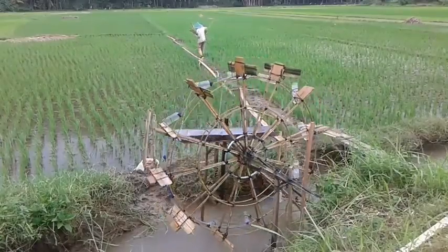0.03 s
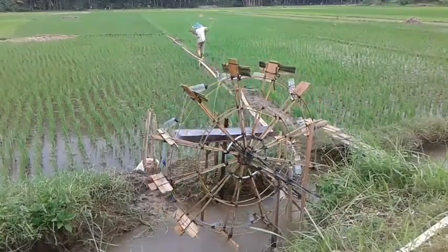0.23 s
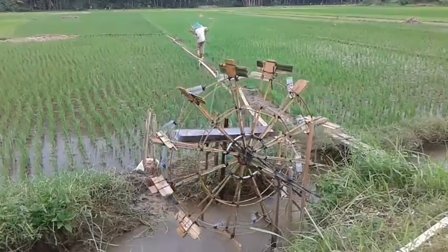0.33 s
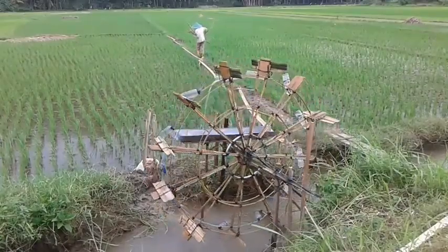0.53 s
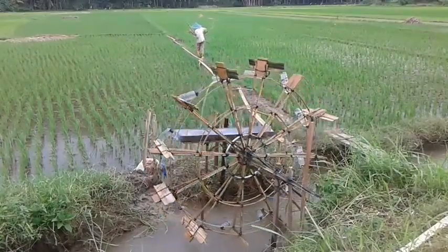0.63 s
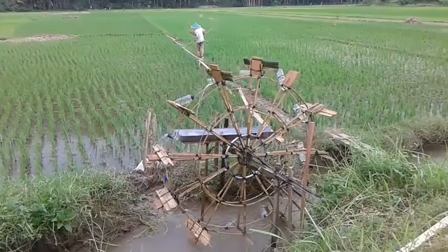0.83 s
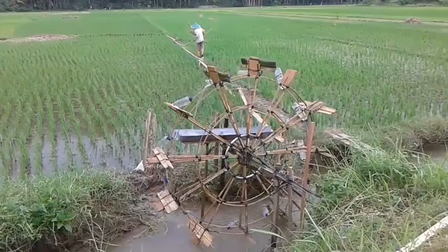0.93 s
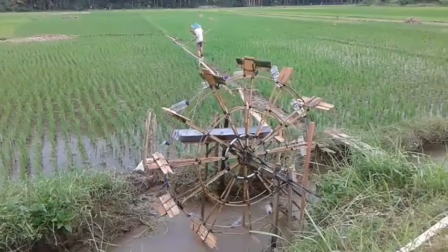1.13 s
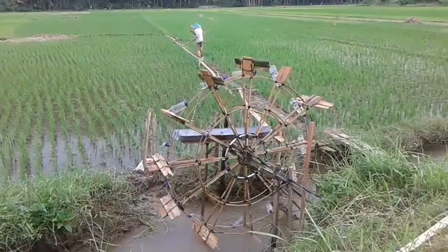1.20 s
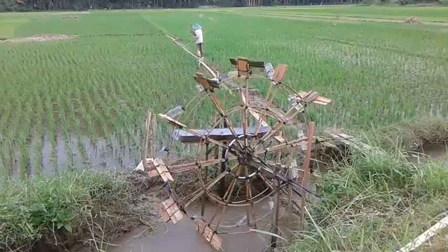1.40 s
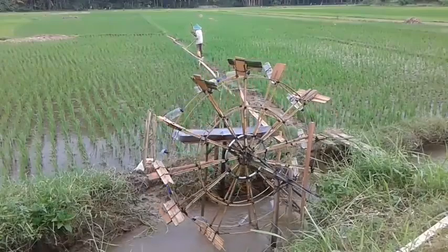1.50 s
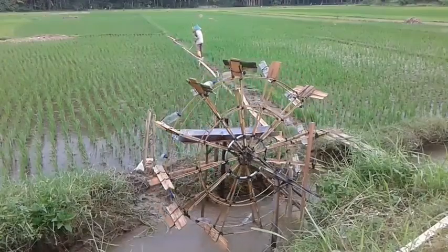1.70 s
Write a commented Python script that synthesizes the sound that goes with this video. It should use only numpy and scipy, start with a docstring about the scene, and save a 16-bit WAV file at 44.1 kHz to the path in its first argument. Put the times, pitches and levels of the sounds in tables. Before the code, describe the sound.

Water drips and spatters from a turning wooden water wheel as wind rumbles, then a slat clacks

```python
"""Wooden water wheel in wind

A small wheel in a channel beside a rice field: filtered noise, clicks and bubble notes make an uneven trickle.
Close drops ring and fizz, droplets tick, dollops land as decaying clusters of clicks, paddles slosh as shaped
noise; late on, a loose slat clacks as a noise burst ringing wood modes. The field is a steady noise hush.
Wind is low rumble following a gust curve, with single pressure pulses buffeting the microphone."""
import sys
import numpy as np
from scipy import signal
from scipy.fft import rfft, irfft
from scipy.io import wavfile
from scipy.ndimage import uniform_filter1d

SR = 44100
rng = np.random.default_rng(int(sys.argv[2]) if len(sys.argv) > 2 else 0)


def bounce(signal):
    """Save signal as a 16-bit WAV file at the path given by the first command-line argument."""
    frames = np.transpose(np.atleast_2d(signal))
    limited = np.clip(frames, -1, 1)
    pcm = np.round(limited * 32767).astype(np.int16)
    wavfile.write(sys.argv[1], SR, pcm)


N = 77175

# fine splashing spectrum [f/Hz, relative level/dB per Hz]
SPLASH_SPECTRUM = [(200, -13.5), (600, -5.5), (1200, -3.5), (2300, -4.5), (3100, -2.5), (3900, 2.5),
                   (4600, -5.5), (5600, -9.5), (7000, -18.5), (10000, -16.5), (11000, -33), (17000, -50)]


def amp(db):
    """Decibels to gain."""
    return 10 ** (np.asarray(db) / 20)


def evened(x):
    """Scales to rms 1."""
    return x / np.sqrt(np.mean(x ** 2) + 1e-20)


def decay(t, t60_s):
    """Exponential decay, -60 dB at t60_s."""
    return np.exp(-np.log(1000) * t / t60_s)


def read(points, hz):
    """Interpolates a dB spectrum on a log-frequency axis."""
    f, value = np.transpose(points)
    return np.interp(np.log(hz + 1), np.log(f + 1), value)


def level(curve):
    """A dB curve over time as a gain for every sample."""
    return amp(np.interp(np.arange(N) / SR, *np.transpose(curve)))


def add(mix, s, sound):
    """Mixes a sound in at s seconds, cut at the end of the mix."""
    part = mix[max(round(s * SR), 0):][:len(sound)]
    part += sound[:len(part)]


def colour(x, points, tilt_db_per_octave=0, size=4096):
    """Minimum-phase filter with the given spectrum, tilted about 2 kHz between 600 and 5500 Hz."""
    hz = abs(np.fft.fftfreq(size, 1 / SR))
    octaves = np.log2(np.clip(hz, 600, 5500) / 2000)
    log_gain = np.log(amp(read(points, hz) + tilt_db_per_octave * octaves))
    # Hilbert transform of log gain gives the causal phase
    taps = np.fft.ifft(np.exp(np.conj(signal.hilbert(log_gain)))).real[:size // 2]
    return signal.fftconvolve(x, taps)[:len(x)]


def impacts(per_s, spread_db):
    """Random clicks of either sign, most small and a few large."""
    size = amp(spread_db * np.minimum(rng.exponential(1, N), 3.5))
    sign = rng.choice([-1, 1], N)
    return size * sign * (rng.random(N) < per_s / SR)


def ping(hz, t60_s):
    """A trapped bubble: a soft start, a slightly rising note, a quick decay."""
    rise_s, glide_per_s = 0.00023, 1.8
    t = np.arange(SR // 12) / SR
    envelope = (1 - np.exp(-(t / rise_s) ** 2)) * decay(t, t60_s)
    note = np.sin(2 * np.pi * hz * t * (1 + glide_per_s * t / 2))
    return envelope / envelope.max() * note


def bubbles(per_s, centre_hz, octaves, t60_s, count=32):
    """A crowd of bubbles: random pings at pitches spread round one centre."""
    share = (np.arange(count) + .5) / count
    # logistic spread: dense at the centre, sparse at the edges
    pitches_hz = centre_hz * 2 ** (octaves * np.log(share / (1 - share)) / 2)
    total = 0
    for hz in pitches_hz:
        clicks = impacts(per_s / count, spread_db=3.6)
        total = total + signal.oaconvolve(clicks, ping(hz, t60_s))[:N]
    return evened(total)


def splashing(size=256):
    """Spray too fine to resolve: a hiss that flickers overall and shifts in time-frequency patches."""
    flicker_db, patch_db = 1.0, 2.2
    hz, t, z = signal.stft(rng.standard_normal(N), SR, nperseg=size)
    flicker = evened(uniform_filter1d(rng.standard_normal(len(t)), size=5))
    patches = uniform_filter1d(rng.standard_normal(z.shape), size=6, axis=0)
    patches = evened(uniform_filter1d(patches, size=5, axis=1))
    gain_db = read(SPLASH_SPECTRUM, hz)[:, None] + flicker_db * flicker + patch_db * patches
    return evened(signal.istft(z * amp(gain_db), SR, nperseg=size)[1][:N])


def trickle():
    """Water falling from the scoops: spray, spatter, small bubbles and deeper gurgles follow one flow."""
    # flow of spilling water [t/s, relative level/dB]
    flow = [(0, -7), (.2, -6.5), (.33, -1.5), (.5, -2.5), (.7, 0.5), (.85, 0), (1.0, 0), (1.2, 0),
            (1.35, -5), (1.6, -4.5), (1.75, -15)]
    spray_db, spatter_db, bubble_db, gurgle_db = -51.5, -53, -54, -58.5
    spatter = evened(colour(impacts(per_s=600, spread_db=4.5), SPLASH_SPECTRUM))
    small = bubbles(per_s=380, centre_hz=3627, octaves=0.319, t60_s=0.016)
    gurgles = bubbles(per_s=90, centre_hz=1512, octaves=0.6, t60_s=0.056)
    water = amp(spray_db) * splashing() + amp(spatter_db) * spatter
    water = water + amp(bubble_db) * small + amp(gurgle_db) * gurgles
    return level(flow) * water


def slosh():
    """The paddles push through the channel with a low wash of shaped noise."""
    # slosh round the paddles [t/s, level/dB]
    slosh_curve = [(0, -58), (.2, -68), (.34, -48.5), (.37, -49.5), (.52, -44), (.6, -52), (.9, -55.5),
                   (1.15, -54), (1.33, -54), (1.42, -49), (1.6, -49.5), (1.75, -53.5)]
    # its spectrum [f/Hz, relative level/dB per Hz]
    slosh_spectrum = [(150, 4.5), (350, -9.5), (530, 2), (830, -9), (1050, -18), (1600, -26), (3000, -10),
                      (8000, -58)]
    return level(slosh_curve) * evened(colour(rng.standard_normal(N), slosh_spectrum))


def field_hush():
    """The open field: a steady hush of shaped noise."""
    # field spectrum [f/Hz, relative level/dB per Hz]
    field_spectrum = [(25, -1), (110, -4.5), (250, 3.5), (380, 0), (520, -8), (900, -7.5), (2400, -16),
                      (3300, -10.5), (4000, -5.5), (4700, -15.5), (7000, -23.5), (10000, -27.5),
                      (11000, -25), (17000, -28)]
    return amp(-51) * evened(colour(rng.standard_normal(N), field_spectrum))


def wind(size=2200):
    """Lumpy turbulence rumbles with the gust; single eddies give short pressure pops."""
    # wind at the microphone [t/s, level/dB]
    gust = [(0, -50.5), (.17, -46), (.33, -39.5), (.40, -40.5), (.435, -32.5), (.51, -34), (.56, -44.5),
            (.61, -37), (.66, -31.5), (.72, -37), (.85, -33), (.91, -39.5), (1.0, -40), (1.12, -38),
            (1.26, -41.5), (1.42, -50.5), (1.48, -44.5), (1.75, -67.5)]
    # rumble spectrum [f/Hz, relative level/dB per Hz]
    rumble_spectrum = [(15, -46), (35, -5), (60, 0), (95, 3), (160, -4.5), (230, -10.5), (320, -16),
                       (500, -35.5), (1000, -50), (3000, -66), (6000, -110)]
    # eddies popping on the microphone [t/s, f/Hz, level at t/dB]
    buffets = [(0.3597, 97, -25), (0.4316, 93, -20.5), (0.6184, 180, -12.5), (0.502, 125, -26),
               (0.7533, 138, -21), (0.7968, 144, -19), (0.8544, 101, -17.5), (0.989, 125, -26.5),
               (1.1102, 88, -30.5)]
    eddy_db, eddy_s = 4.5, 0.021
    lean, rebound = 0.27, 1.04  # pulse asymmetry, undershoot
    lumps = evened(uniform_filter1d(rng.standard_normal(N + size), round(eddy_s * SR)))
    rumble = colour(rng.standard_normal(N + size) * amp(eddy_db * lumps), rumble_spectrum)
    # level the running rms, then drop the lead-in
    rumble = (rumble / np.sqrt(uniform_filter1d(rumble ** 2, size) + 1e-20))[size:]
    out = level(gust) * rumble
    for s, hz, db in buffets:
        u = np.pi * hz * (np.arange(N) / SR - s)
        pulse = (1 - 2 * rebound * u ** 2 + lean * u) / (1 + u ** 2 / 2) ** np.pi
        out = out + amp(db) * pulse
    return out


def drops():
    """Each near drop ticks on the surface, rings a bubble and leaves a fizz of noise round its pitch."""
    # near drops [t/s, starting f/Hz, level/dB, ring t60/s]
    near_drops = [(0.043, 3260, -40, .02), (0.1313, 3920, -35, 0.01), (0.143, 4870, -43, 0.0089),
                  (.196, 4420, -39, 0.017), (0.2089, 3170, -31.5, 0.025), (0.2274, 3240, -29.5, 0.013),
                  (0.2307, 3750, -29.5, 0.013), (.502, 3980, -37, 0.037), (.529, 1855, -37.5, 0.026),
                  (.579, 3720, -33, 0.011), (0.614, 3660, -51, 0.028), (0.639, 1980, -40, 0.024),
                  (0.6414, 2900, -26.5, 0.012), (0.7166, 3786, -30, 0.02), (0.7636, 3610, -33.5, .012),
                  (0.792, 4000, -41, 0.031), (.920, 3530, -37.5, 0.024), (0.9228, 1610, -36, 0.026),
                  (.926, 3790, -37.5, 0.037), (0.9653, 3200, -29, 0.004), (1.009, 3100, -37, 0.019),
                  (1.0693, 3800, -34.5, 0.013), (1.134, 3750, -33, 0.006), (1.361, 1236, -42, 0.026),
                  (1.408, 4230, -38, 0.011), (1.4658, 4750, -34.5, 0.0054), (1.563, 3660, -30.5, 0.0081),
                  (1.57, 5470, -38.5, 0.011), (1.643, 4400, -33.5, 0.0026)]
    tick_gain, fizz_gain = 0.58, 0.39  # re bubble note
    fizz_octaves, fizz_linger = 0.28, 2.5  # half-width; t60 re ring
    out, hz_bins = np.zeros(N), np.fft.rfftfreq(SR // 12, 1 / SR)
    for s, hz, db, t60_s in near_drops:
        note = ping(hz, t60_s)
        t = np.arange(len(note)) / SR
        near = 1 / (1 + (np.log2((hz_bins + 1) / hz) / fizz_octaves) ** 2)
        fizz = evened(irfft(rfft(rng.standard_normal(len(t))) * near, len(t)))
        fizz *= np.minimum(t / 0.00067, 1) * decay(t, t60_s * fizz_linger)
        tick = colour(signal.unit_impulse(len(t)), SPLASH_SPECTRUM)
        add(out, s, amp(db) * (note + fizz_gain * fizz + tick_gain * tick / abs(tick).max()))
    return out


def ticks():
    """Tiny droplets hit hard parts of the wheel and burst: a click with a short noise tail."""
    # droplet hits [t/s, peak level/dB]
    tick_hits = [(.129, -42), (.1325, -41), (.1445, -43), (0.1988, -37), (0.2267, -40), (0.2323, -52),
                 (0.396, -36), (.494, -33.5), (.727, -45), (0.766, -36), (1.067, -34.5), (1.1431, -33.5),
                 (1.213, -35), (1.366, -32.5), (1.465, -42), (1.554, -45), (1.6183, -32), (1.6438, -35)]
    # tick spectrum [f/Hz, relative level/dB per Hz]
    tick_spectrum = [(1000, 3), (3000, -8.5), (4700, -6), (6000, -7), (8500, -11), (11000, -31.5),
                     (17000, -43)]
    burst_gain, burst_t60_s = 0.36, 0.011
    out, t = np.zeros(N), np.arange(SR // 20) / SR
    for s, db in tick_hits:
        burst = burst_gain * rng.standard_normal(len(t)) * decay(t, burst_t60_s)
        tick = colour(signal.unit_impulse(len(t)) + burst, tick_spectrum)
        add(out, s, amp(db) * tick / abs(tick).max())
    return out


def splats():
    """A dollop breaks into a cluster of droplets that swells quickly and trails off."""
    # dollops landing [t/s, level/dB, t60/s, brightness/dB per octave]
    dollops = [(.150, -53, 0.13, 6), (.227, -53, 0.091, -3), (.263, -50.5, 0.12, 18),
               (.355, -38, 0.11, -1.5), (.360, -35, 0.13, 2.5), (.501, -48, .09, -2), (.670, -48, 0.18, 17),
               (.919, -45, 0.11, -1), (1.184, -45.5, 0.17, 5), (1.255, -40, 0.044, 2),
               (1.306, -43, 0.049, -5.5), (1.408, -42.5, 0.15, -1)]
    # dollop spectrum [f/Hz, relative level/dB per Hz]
    dollop_spectrum = [(200, -25), (750, 3), (1200, -10.5), (2100, -4.5), (2800, -2.5), (4300, -6),
                       (5300, -17.5), (7000, -27.5), (11000, -38), (17000, -54)]
    rise_s = 0.0022
    out, t = np.zeros(N), np.arange(SR // 5) / SR
    for s, db, t60_s, bright_db in dollops:
        grains = impacts(per_s=5000, spread_db=5.5)[:len(t)]
        grains = evened(colour(grains, dollop_spectrum, bright_db))
        envelope = np.minimum(t / rise_s, 1) * decay(np.maximum(t - rise_s, 0), t60_s)
        add(out, s, amp(db) * envelope * grains)
    return out


def clacks():
    """A loose slat strikes brightly and chatters as a noise burst, ringing the modes of the wooden frame."""
    # clack [t/s, level/dB, first-contact knock gain, wood ring re force/dB]
    clack_hits = [(1.479, -34, 2.4, -9.5)]
    # frame modes [f/Hz, relative level/dB, t60/s]
    wood_modes = [(1190, -30, 0.051), (1480, -13, 0.061), (1670, -22, 0.047), (1950, 3, 0.035),
                  (2700, -18, .03), (3150, -15, 0.018)]
    # dull, unpitched part [f/Hz, relative level/dB per Hz]
    rattle_spectrum = [(150, -22), (600, -6.5), (1200, -1.5), (2000, 0.5), (3300, -7), (4400, -13),
                       (5500, -21), (10000, -44), (17000, -40)]
    # bright edge of the first contact [f/Hz, relative level/dB per Hz]
    edge_spectrum = [(500, -12), (1800, -2), (2900, -4), (4300, -6), (5300, -23), (10000, -34),
                     (17000, -46)]
    rise_s, hold_s, t60_s = 0.0027, 0.0047, 0.087
    tail_db, tail_t60_s = -17.5, 0.43
    edge_db, edge_t60_s = -34, 0.028
    out, t = np.zeros(N), np.arange(SR // 4) / SR
    after_s = np.maximum(t - hold_s, 0)
    fall = decay(after_s, t60_s) + amp(tail_db) * decay(after_s, tail_t60_s)
    chatter = np.minimum(.5 + .5 * t / rise_s, 1) * fall
    ring = sum(amp(db) * decay(t, mode_t60_s) * np.sin(2 * np.pi * hz * t)
               for hz, db, mode_t60_s in wood_modes)
    for s, db, knock, wood_db in clack_hits:
        first = colour(signal.unit_impulse(len(t)), rattle_spectrum)
        rattle = evened(colour(rng.standard_normal(len(t)), rattle_spectrum))
        force = chatter * rattle + knock * first / abs(first).max()
        body = evened(signal.fftconvolve(force, ring)[:len(t)]) * force.std()
        edge = evened(colour(rng.standard_normal(len(t)), edge_spectrum)) * decay(t, edge_t60_s)
        add(out, s, amp(db) * (force + amp(wood_db) * body) + amp(edge_db) * edge)
    return out


def banks(x):
    """Water and channel banks: adds a short, sparse scatter of decaying reflections."""
    scatter_db, t60_s, echoes_per_s = -8.5, 0.039, 2000
    t = np.arange(SR // 5) / SR
    taps = rng.standard_normal(len(t)) * (rng.random(len(t)) < echoes_per_s / SR) * (t > .002)
    taps = taps * decay(t, t60_s)
    return x + amp(scatter_db) * signal.fftconvolve(x, taps / np.linalg.norm(taps))[:N]


def scene():
    """The wheel and its water in the open field, with wind on the microphone; one channel."""
    water = banks(trickle() + drops()) + slosh() + ticks() + splats()
    return (water + field_hush() + wind() + clacks())[None]


def record(dry):
    """The recorder's band limit: linear-phase low-pass at 17050 Hz."""
    lowpass = signal.firwin(511, 17050, window=("kaiser", 9), fs=SR)
    return signal.oaconvolve(dry, lowpass[None], "same")


dry = scene()
out = record(dry)
bounce(out)
```